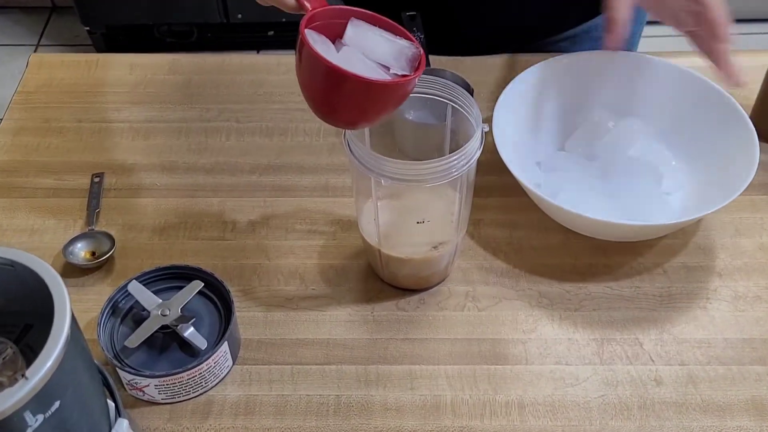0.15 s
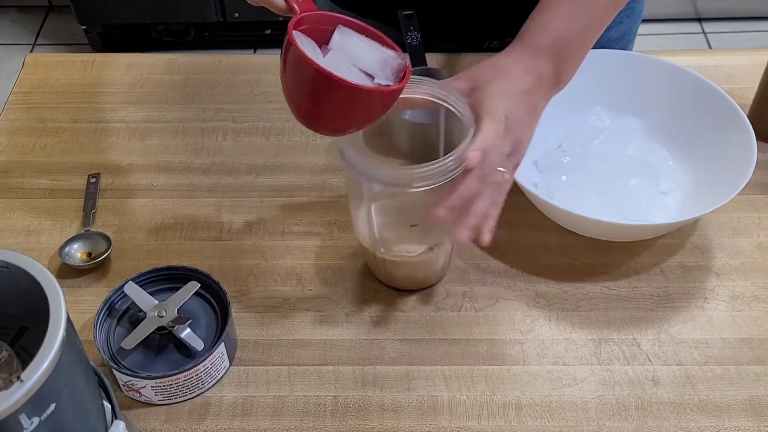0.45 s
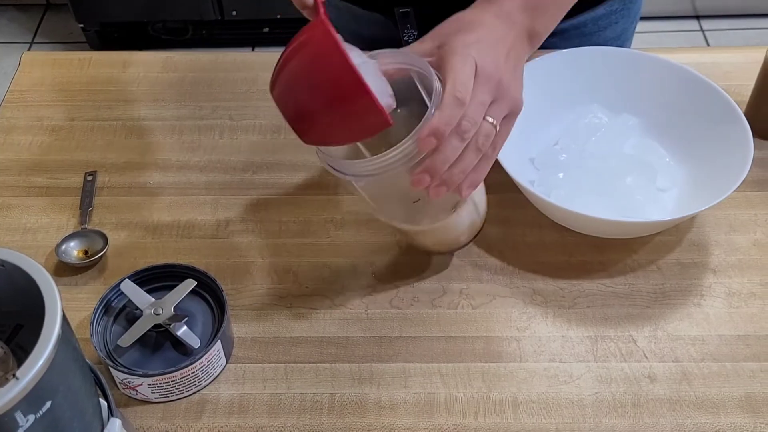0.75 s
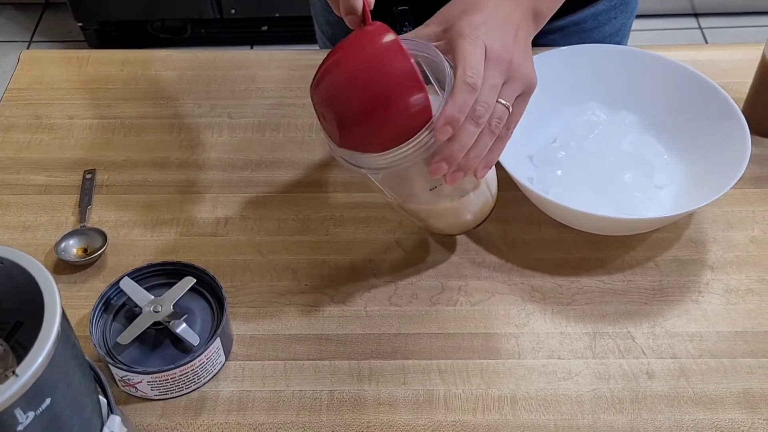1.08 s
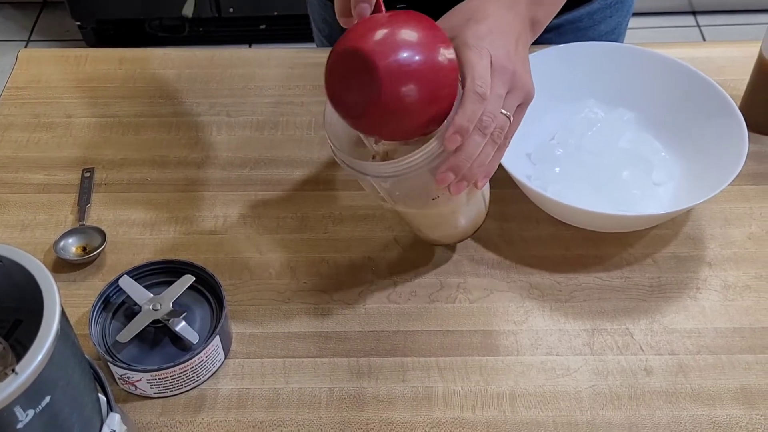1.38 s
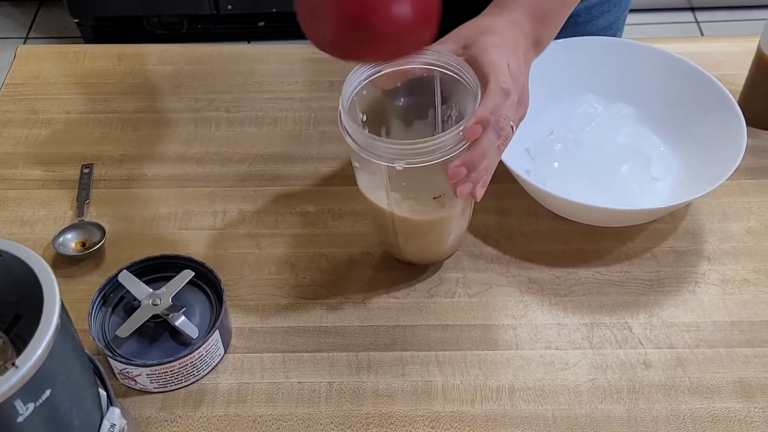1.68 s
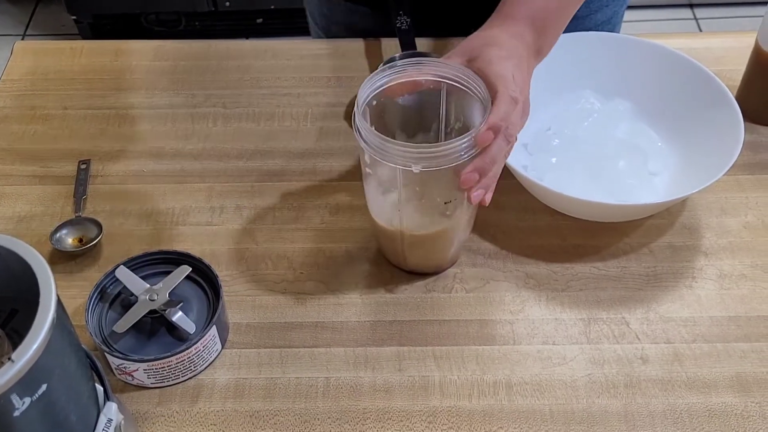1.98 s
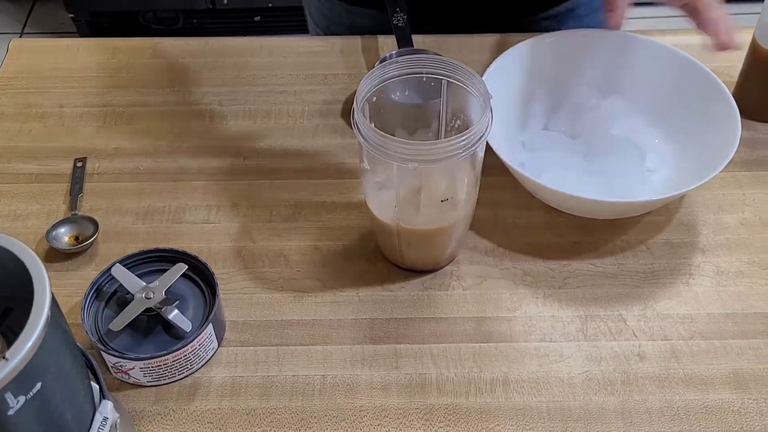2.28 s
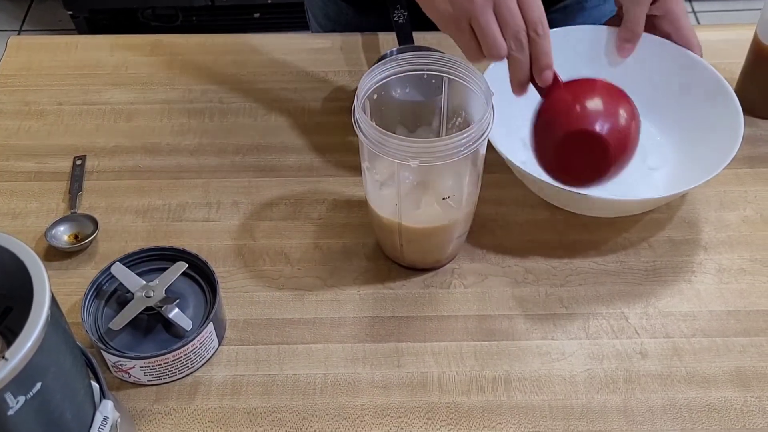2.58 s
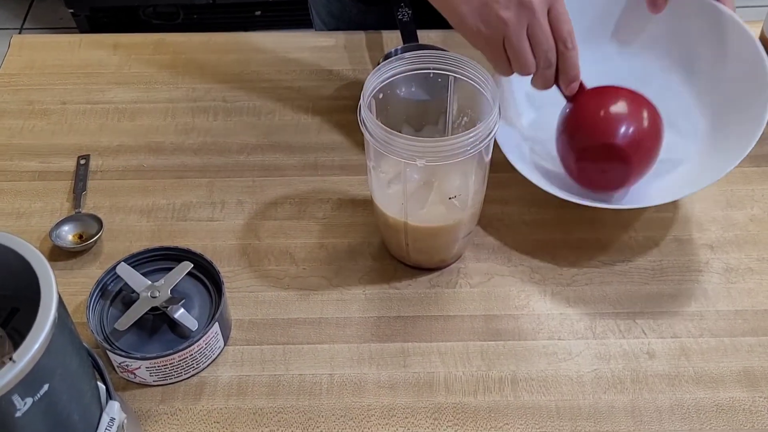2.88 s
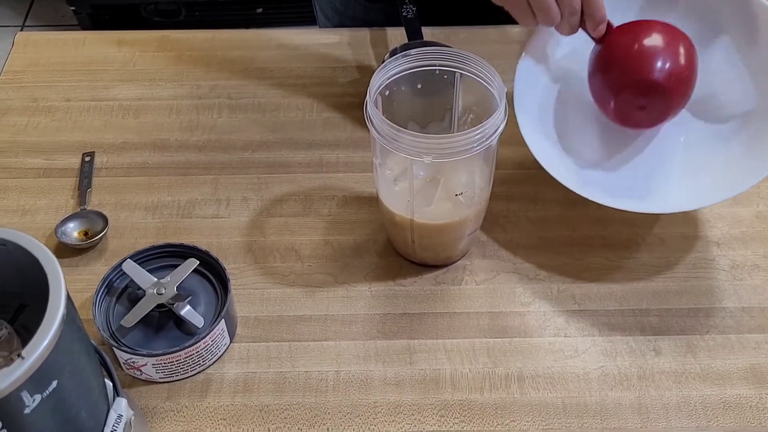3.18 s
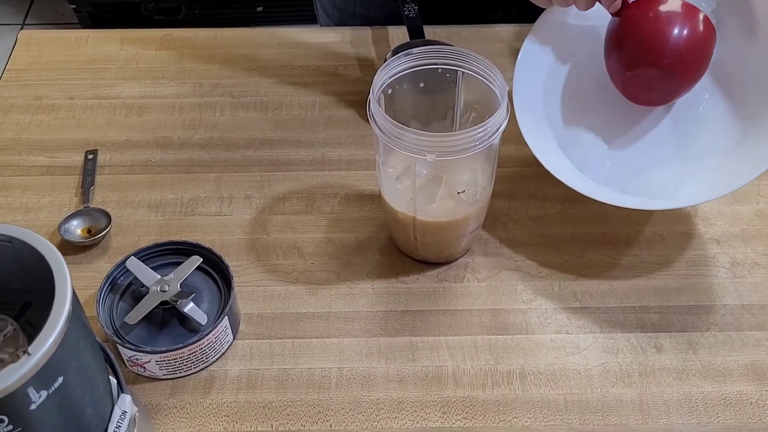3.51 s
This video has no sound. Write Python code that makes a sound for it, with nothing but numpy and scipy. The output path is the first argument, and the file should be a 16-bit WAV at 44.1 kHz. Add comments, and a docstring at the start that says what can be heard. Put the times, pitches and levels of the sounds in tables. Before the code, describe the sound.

Ice cubes rattle from a plastic cup into a blender jug, then get scooped from a bowl

```python
"""Soft knocks and bumps on a wooden counter, then ice cubes slide from a plastic cup into a blender jug.
Noise bursts, short grains and pings make the ice; the jug's hollow note dips, then climbs as it fills.
The jug lands with a thump and a thin metallic ring; a bowl knocks and slides, the cup digs into its ice.
Decaying modes give the thumps and the bowl, resonances colour the ice, gliding tones squeak.
A small, live kitchen echoes all this over quiet air and hum; the right side has more treble."""
import sys
import numpy as np
from scipy import signal
from scipy.fft import rfft, irfft
from scipy.io import wavfile
from scipy.ndimage import uniform_filter1d

SR = 44100
rng = np.random.default_rng(int(sys.argv[2]) if len(sys.argv) > 2 else 0)


def to_wav(sig):
    """Store sig (one row per channel, or 1-D mono) as 16-bit WAV at the path in sys.argv[1].

    Samples outside -1..1 are clipped; the rate is SR.
    """
    pcm = np.clip(np.atleast_2d(sig), -1, 1) * 32767
    pcm = np.round(pcm).astype(np.int16)
    wavfile.write(sys.argv[1], SR, pcm.T)  # frames by channels


N = 160965  # length in samples

# Edges of the low, middle, high and top bands of the ice: (frequency [Hz])
ICE_EDGES_HZ = [600, 1600, 4800, 8000, 15500]
# How alike the two channels of an ice blow are, per band: (correlation [0..1])
ICE_LIKENESS = [0.86, 0.37, 0.37, 0.71]
# Cubes dropping into the jug, before the drop trim:
# (time [s], low [dB], middle [dB], high [dB], top [dB])
DROPS = [(.791, -60, -65, -46, -87), (.864, -64, -60, -37, -51), (.9188, -43.5, -34.5, -22.5, -33),
         (1.0336, -33.5, -36, -23.5, -35.5), (1.0775, -29.5, -23, -33, -38.5),
         (1.1129, -29.5, -40, -21.5, -25.5), (1.1343, -36, -45.5, -19.5, -29.5),
         (1.1975, -43.5, -26.5, -34, -31.5), (1.2225, -33.5, -38.5, -26, -46.5),
         (1.2356, -25, -14.5, -14, -26), (1.2525, -29.5, -31.5, -16.5, -30), (1.282, -25.5, -36, -29, -35),
         (1.332, -37, -30, -26.5, -34.5), (1.503, -47, -54, -70, -47), (1.7559, -60, -50, -72, -87),
         (1.8028, -50.5, -43.5, -89, -80), (1.8796, -50.5, -45, -52, -60.5)]
# Decay of a drop, per band: (t60 [s])
DROP_T60 = [0.061, 0.042, 0.14, 0.067]
# Cubes jostling between the larger hits, before the pour trim: (time [s], body [dB], treble [dB])
POUR_MOTION = [(.76, -57, -57.5), (.85, -47.5, -51), (.91, -45, -62.5), (.95, -32.5, -29), (1.02, -35, -36),
               (1.09, -37, -32), (1.19, -53, -39.5), (1.27, -27.5, -31.5), (1.34, -28, -39),
               (1.42, -28.5, -29.5), (1.5, -52.5, -45), (1.58, -64.5, -85)]
# Resonances of the jug walls: (frequency [Hz], width [Hz], boost or cut [dB])
JUG_RESONANCES = [(836, 49, 1.5), (1157, 62, 6.5), (1700, 200, -11), (1934, 41, 7.5), (2150, 54, 10.5),
                  (2940, 140, 7), (6280, 150, 8)]
# Knocks on the air in the jug: (time [s], pitch [Hz], level [dB])
HOLLOW_NOTES = [(.93, 522, -42), (.97, 511, -40.5), (1.08, 493.2, -27), (1.125, 487, -26),
                (1.167, 500.5, -30), (1.262, 560.7, -25.5), (1.303, 577, -29), (1.38, 597, -44),
                (1.42, 615, -32), (1.465, 636, -43.5)]
HOLLOW_RISE_S, HOLLOW_WOBBLE = 0.011, 0.068  # time to full strength; rms share of the pitch
DROP_TRIM_DB, POUR_TRIM_DB = -4.5, -10


def pouring():
    """Ice tumbles into the jug and sounds its walls; the heavier cubes make the air inside hoot."""
    drops = blows(DROPS, ICE_EDGES_HZ, DROP_T60, ICE_LIKENESS)
    ice = amp(DROP_TRIM_DB) * drops + amp(POUR_TRIM_DB) * jostle(POUR_MOTION)
    out = vessel(ice, JUG_RESONANCES)
    for s, hz, db in HOLLOW_NOTES:
        add(out, s, amp(db) * chirp(hz, HOLLOW_RISE_S, 0, HOLLOW_WOBBLE))
    return out


# Single cubes and walls ringing out: (time [s], pitch [Hz], level [dB])
CLINKS = [(.791, 1230, -38.5), (.871, 1296, -34.5), (.92, 1265, -29), (1.034, 1214, -24),
          (1.151, 1130, -24), (1.222, 1130, -20.5), (1.281, 1097, -17), (1.404, 1968, -22.5),
          (1.41, 847, -21.5), (1.501, 850, -34.5), (2.889, 1757, -21.5), (3.143, 2090, -22),
          (3.163, 2160, -21), (3.185, 883, -19.5), (3.279, 866, -23), (3.351, 898, -17.5),
          (3.466, 877, -24), (3.614, 2200, -25.5)]
CLINK_T60_S = 0.037
PARTIAL_RATIO, PARTIAL_DB = 1.92, -16  # the weaker, higher partial, relative to the main one


def clinks():
    """Short pings among the rattle, each of two partials that die together."""
    out = np.zeros((2, N))
    for s, hz, db in CLINKS:
        main = (hz, db, CLINK_T60_S)
        upper = (hz * PARTIAL_RATIO, db + PARTIAL_DB, CLINK_T60_S)
        out += ring(s, [main, upper])
    return out


# Wet ice slipping: (time [s], pitch [Hz], level [dB], glide [octaves/s])
SQUEAKS = [(1.11, 3760, -22, 11), (1.11, 7530, -22, -8), (1.134, 6670, -23.5, -9), (1.348, 3400, -31.5, 12),
           (1.442, 3967, -31.5, 12.5), (2.902, 3850, -22.5, 10.5), (3.332, 7590, -14, -8.5)]
SQUEAK_RISE_S, SQUEAK_WOBBLE = 0.0043, 0.042  # time to full strength; rms share of the pitch


def squeaks():
    """Wet ice slips in brief gliding chirps."""
    out = np.zeros((2, N))
    for s, hz, db, glide in SQUEAKS:
        add(out, s, amp(db) * chirp(hz, SQUEAK_RISE_S, glide, SQUEAK_WOBBLE))
    return out


# The cup striking ice in the bowl, before the dig trim:
# (time [s], low [dB], middle [dB], high [dB], top [dB])
DIGS = [(2.49, -57, -57, -60, -68), (2.644, -45, -29.5, -23, -25.5), (2.7628, -23, -24.5, -20, -38),
        (2.8107, -23.5, -22, -28, -56), (2.883, -26.5, -21.5, -16, -19.5),
        (2.9469, -24.5, -22.5, -20, -21.5), (3.0232, -35, -21.5, -44, -52),
        (3.1015, -32.5, -24.5, -30, -38), (3.1414, -34, -25, -31.5, -36), (3.1848, -21.5, -21, -22, -29),
        (3.2382, -30, -21.5, -19.5, -31.5), (3.2771, -23, -23, -19.5, -26.5), (3.314, -27, -25, -20.5, -42),
        (3.333, -43, -47, -18, -18.5), (3.351, -21.5, -22.5, -16.5, -21.5), (3.377, -25, -16, -13.5, -19.5),
        (3.466, -28.5, -35, -25, -37), (3.62, -37, -33.5, -34, -39)]
# Decay of a dig, per band: (t60 [s])
DIG_T60 = [0.087, 0.11, 0.091, 0.025]
# Cubes jostling around the cup, before the scoop trim: (time [s], body [dB], treble [dB])
SCOOP_MOTION = [(2.765, -21.5, -14), (2.82, -25, -25), (2.92, -33, -42), (3.0, -27.5, -22.5),
                (3.12, -39.5, -28), (3.2, -30.5, -31), (3.3, -32, -26.5), (3.38, -48, -22),
                (3.46, -28, -43), (3.52, -65, -56), (3.6, -41, -42), (3.65, -34, -59)]
# Resonances of the ice lying in the bowl: (frequency [Hz], width [Hz], boost [dB])
HEAP_RESONANCES = [(730, 23, 5.5), (880, 73, 7.1), (4130, 400, 4.1), (6860, 1600, 6.56)]
# Resonances of the cup: (frequency [Hz], width [Hz], boost [dB])
CUP_RESONANCES = [(2200, 70, 12.3), (2415, 51, 11.3)]
# Modes of the bowl, struck once by the cup: (frequency [Hz], level [dB], t60 [s])
BOWL_MODES = [(970, -24, 0.054), (1422, -18, 0.049), (1480, -26, 0.026), (2028, -22, 0.06),
              (2736, -29, 0.11), (4870, -23.5, 0.058), (8300, -29.5, 0.12)]
DIG_TRIM_DB, SCOOP_TRIM_DB = -5, -9.5
CUP_FILLED_S = 3.13  # from here on cubes rattle inside the cup
BOWL_AT_S, BOWL_BUZZ = 2.644, 0.36  # the rim of the cup buzzes against the bowl, rms depth
BOWL_LAG_S = .0001  # the bowl stands to the right, so it reaches the left microphone later


def scooping():
    """The cup clacks on the bowl and ploughs through the cubes, which then rattle inside it."""
    digs = blows(DIGS, ICE_EDGES_HZ, DIG_T60, ICE_LIKENESS)
    ice = amp(DIG_TRIM_DB) * digs + amp(SCOOP_TRIM_DB) * jostle(SCOOP_MOTION)
    caught = ice * (np.arange(N) / SR > CUP_FILLED_S)
    cup_ring = vessel(caught, CUP_RESONANCES) - caught
    clack = ring(BOWL_AT_S, BOWL_MODES) * (1 + BOWL_BUZZ * flutter((2, N)))
    left, right = vessel(ice, HEAP_RESONANCES) + cup_ring + clack + ice_thud(ice)
    late_left = np.pad(left, (round(BOWL_LAG_S * SR), 0))[:N]
    return np.array([late_left, right])


# What the counter passes on of the digging: (frequency [Hz], gain [dB])
THUD_COLOUR = [(120, -19), (240, 2), (330, 3), (520, -3), (900, -20), (3000, -69)]
THUD_UNTIL_S, THUD_FADE_DB_PER_S = 2.95, 19  # the cup presses on the bowl, then lifts


def ice_thud(ice):
    """The push of each contact reaches the counter as a low patter, fading as the cup lifts."""
    push = np.sqrt(abs(uniform_filter1d(ice.mean(0) ** 2, size=200)) + 1e-14)
    lifted_s = np.maximum(np.arange(N) / SR - THUD_UNTIL_S, 0)
    fade = amp(-THUD_FADE_DB_PER_S * lifted_s)
    return colour(push * fade * rng.standard_normal(N), THUD_COLOUR)


# The jug landing and settling: (time [s], thump [dB], low [dB], middle [dB], high [dB])
JUG_KNOCKS = [(1.9197, -6.5, -26, -29.5, -31), (1.9278, -29, -21.5, -31.5, -35.5),
              (1.941, -17, -28.5, -37.5, -47), (1.967, -28, -32.5, -42, -39.5),
              (2.01, -26.5, -35, -43, -45)]
# Modes of the wooden top under the jug: (frequency [Hz], level [dB], t60 [s])
COUNTER_MODES = [(46.6, -27, 0.36), (117, -17, .1), (250, 4, 0.06), (395, -14, 0.073), (672, -8, 0.071)]
# The bowl knocking on the counter: (time [s], thump [dB], low [dB], middle [dB], high [dB])
BOWL_KNOCKS = [(.002, -24, -34.5, -42, -49), (.03, -24.5, -38.5, -53, -57.5),
               (2.569, -19, -38, -43.5, -53.5), (2.603, -22, -32.5, -54, -68),
               (2.645, -17.5, -34, -51, -60)]
# Modes of the bowl rocking on its foot: (frequency [Hz], level [dB], t60 [s])
FOOT_MODES = [(267, -2.5, 0.1), (342, -3.5, 0.051), (444, -1, .03)]
# Soft, dull bumps as jug and bowl are handled, and last the low rumble of the bowl sliding:
# (time [s], level [dB])
BUMPS = [(0.29, -36), (0.326, -27.5), (.368, -23), (.45, -34), (.495, -46.5), (2.655, -31.5)]
# Spectrum of a bump: (frequency [Hz], gain [dB])
BUMP_COLOUR = [(30, -30), (70, -4.5), (150, 2.5), (300, -5), (600, -22.5), (1200, -35), (12000, -65.5)]
# Thin metallic ring shaken loose when the jug lands: (frequency [Hz], level [dB], t60 [s])
TING_MODES = [(8420, -47, 0.2), (8040, -43, 0.3), (8900, -40, 0.25), (11910, -37, 0.31), (13360, -50, 0.12)]
BUMP_RISE_S, BUMP_T60_S, TING_AT_S = 0.03, 0.23, 1.921


def counter():
    """The jug lands, the bowl rocks on its foot; dull noise swells for handling and the bowl sliding."""
    out = knocks(JUG_KNOCKS, COUNTER_MODES) + knocks(BOWL_KNOCKS, FOOT_MODES)
    t = np.arange(SR // 4) / SR
    for s, db in BUMPS:
        dull = unit(colour(rng.standard_normal(len(t)), BUMP_COLOUR))
        swell = np.minimum(t / BUMP_RISE_S, 1)
        add(out, s, dull * swell * amp(db - 60 * t / BUMP_T60_S))
    return out + ring(TING_AT_S, TING_MODES)


# Edges of the three clatter bands: (frequency [Hz])
KNOCK_EDGES_HZ = [310, 780, 1900, 7000]
# Decay of the clatter, per band: (t60 [s])
KNOCK_T60 = [0.065, 0.18, 0.035]
# How alike the two channels of the clatter are, per band: (correlation [0..1])
KNOCK_LIKENESS = [0.99, 0.59, 0.33]
THUMP_LOW_CUT_HZ = 68  # keeps the thump free of deep boom


def knocks(rows, modes):
    """Hard contacts with the counter: a thump in the given modes under a short clatter."""
    clatter = [(s, *bands) for s, _, *bands in rows]
    out = blows(clatter, KNOCK_EDGES_HZ, KNOCK_T60, KNOCK_LIKENESS)
    low_cut = signal.butter(3, THUMP_LOW_CUT_HZ, "high", fs=SR, output="sos")
    thump = signal.sosfilt(low_cut, ring(0, modes))
    for s, thump_db, *_ in rows:
        add(out, s, -amp(thump_db) * thump)
    return out


CRACK_DB, CRACK_S = -2, .0025  # first instant of contact: level against the ring, time constant
CHATTER_DB = 4.5  # a contact rattles briefly: level swing per unit of flutter


def blows(rows, edges_hz, t60s, likeness):
    """Each blow is a crack and a brief chattering ring, dying at its own rate in each band."""
    t, out = np.arange(SR // 8) / SR, np.zeros((2, N))
    noise = rng.standard_normal((len(rows), len(t60s), 2, len(t)))
    chatter = amp(CHATTER_DB * np.minimum(flutter((len(rows), 1, len(t))), 2))
    crack = amp(CRACK_DB) * np.exp(-t / CRACK_S)
    level = np.sqrt(SR / 100 / len(t))  # each hit has the energy of 10 ms at its table level
    for k, t60 in enumerate(t60s):
        c = likeness[k]
        stereo = np.array([[1, 0], [c, np.sqrt(1 - c * c)]]) @ noise[:, k]
        decay = np.exp(-np.log(1000) * t / t60)
        band = signal.butter(3, edges_hz[k:k + 2], "band", fs=SR, output="sos")
        hits = signal.sosfilt(band, stereo * (chatter * decay + crack))
        for row, hit in zip(rows, hits):
            add(out, row[0], amp(row[k + 1]) * unit(hit) * level)
    return out


GRAINS_PER_S, GRAIN_SPREAD_DB = 600, 4.5  # mean rate; scale of the random extra strength
BODY_HZ, TREBLE_HZ, FIZZ_HZ = (646.3, 3492), (3198, 8100), (7160, 15800)  # range of the modes
FIZZ_DB = -9.5  # relative to the treble


def jostle(curve):
    """Many small contacts of cube on cube, following the motion of the heap."""
    s, body_db, treble_db = np.transpose(curve)
    t = np.arange(N) / SR
    moving = (t > s[0]) & (t < s[-1])
    strength = amp(GRAIN_SPREAD_DB * np.minimum(rng.exponential(1, N), 4))
    clicks = moving * (rng.random(N) < GRAINS_PER_S / SR) * strength
    rms_moving = np.sqrt(moving.mean())  # sets rms near 1 while the heap moves
    body, treble, fizz = (unit(grains(clicks, band)) * rms_moving for band in (BODY_HZ, TREBLE_HZ, FIZZ_HZ))
    bright = treble + amp(FIZZ_DB) * fizz
    return body * amp(np.interp(t, s, body_db)) + bright * amp(np.interp(t, s, treble_db))


GRAIN_CYCLES = 12  # cycles until a mode falls to 1/e


def grains(clicks, range_hz, count=48):
    """Every small contact rings three of many short modes, differently at each microphone."""
    t, out = np.arange(1024) / SR, np.zeros((2, N))
    at = np.flatnonzero(clicks)
    hz = np.geomspace(*range_hz, count)
    sides = np.array([0, 1])[:, None, None]
    for s, chance in zip(at, rng.random((len(at), 3, 4))):
        mode_hz = hz[(chance[:, 0] * count).astype(int), None]
        f = mode_hz * (1 + 0.063 * (chance[:, 1:2] - .5))  # slightly detuned
        phase = 2 * np.pi * chance[:, 2:3] + sides * (chance[:, 3:] - .5) * f / 1500
        modes = np.sin(2 * np.pi * f * t + phase) * np.exp(-f * t / GRAIN_CYCLES)
        add(out, s / SR, clicks[s] * modes.sum(1))
    return out


def ring(at_s, modes):
    """Freely dying modes, struck once; neighbours start in opposite directions."""
    t, out = np.arange(SR // 2) / SR, np.zeros((2, N))
    sound = np.zeros(len(t))
    for k, (hz, db, t60) in enumerate(modes):
        sound += (-1) ** k * amp(db - 60 * t / t60) * np.sin(2 * np.pi * hz * t)
    add(out, at_s, sound)
    return out


def chirp(hz, rise_s, glide, wobble):
    """An unsteady tone that swells and dies away, gliding in octaves per second."""
    t = np.arange(SR // 8) / SR
    octaves = glide * np.minimum(t, 10 * rise_s)
    pitch = hz * 2 ** octaves * (1 + wobble * flutter(len(t)))
    swell = t / rise_s * np.exp(1 - t / rise_s)
    return swell * np.sin(2 * np.pi * np.cumsum(pitch) / SR)


def vessel(x, modes):
    """Lets a vessel ring along with what strikes it."""
    return x + sum((amp(db) - 1) * resonate(x, hz, width) for hz, width, db in modes)


def resonate(x, hz, width):
    """A resonance of gain 1: shifted down to 0 Hz, smoothed by one pole, shifted back."""
    turn, r = np.exp(2j * np.pi * hz * np.arange(N) / SR), np.exp(-np.pi * width / SR)
    smooth = signal.lfilter([1 - r], [1, -r], x / turn + 1e-18)
    return 2 * (turn * smooth).real


# Decay of the kitchen: (frequency [Hz], t60 [s])
ROOM_T60 = [(60, 0.3), (250, 0.42), (800, 0.48), (2500, 0.56), (6000, 0.43), (14000, 0.31)]
ROOM_DB, KNOCK_ROOM_DB = -5, -2  # tail level for the ice; for the counter
EARLY_DB, EARLY_S, ROOM_ONSET_S = -6, .016, 0.011  # reflections: level, span; build-up of the tail


def kitchen(x, room_db):
    """A few reflections from the counter and cupboards, then a diffuse tail."""
    hz, t, z = signal.stft(rng.standard_normal((2, SR * 3 // 4)), SR, nperseg=256)
    decay = amp(-60 * t / read(ROOM_T60, hz)[:, None])
    tail = pair(signal.istft(z * decay, SR, nperseg=256)[1])
    t = np.arange(tail.shape[1]) / SR
    tail *= 1 - np.exp(-t / ROOM_ONSET_S)
    early = np.zeros_like(tail)
    for side in early:
        at = (rng.uniform(.1, 1, size=10) * EARLY_S * SR).astype(int)
        side[at] = rng.choice([-1, 1], size=10)
    early = unit(pair(early) * (t < 2 * EARLY_S))
    echo = (amp(room_db) * unit(tail) + amp(EARLY_DB) * early) / np.sqrt(len(t))
    return x + signal.fftconvolve(x, echo, axes=1)[:, :N]


# Spectrum of the quiet air: (frequency [Hz], gain [dB])
AIR_COLOUR = [(20, -15.5), (45, -11.5), (270, -4), (500, -13), (1500, -25), (7300, -29.5), (16000, -50)]
AIR_DB, HUM_HZ, HUM_DB = -56.5, 117.3, -62


def room_tone():
    """Quiet air as coloured noise, and a faint appliance hum as one sine."""
    air = unit(colour(pair(rng.standard_normal((2, N))), AIR_COLOUR))
    hum = np.sin(2 * np.pi * HUM_HZ * np.arange(N) / SR)
    return amp(AIR_DB) * air + amp(HUM_DB) * hum


# How alike the two channels of a diffuse field are: (frequency [Hz], correlation [0..1])
FIELD_LIKENESS = [(300, 0.87), (700, 0.38), (1500, 0), (4000, 0.0073), (15000, 0.82)]


def pair(x):
    """Makes two unrelated channels partly alike, by frequency, as in a diffuse field."""
    z = rfft(x)
    c = np.clip(read(FIELD_LIKENESS, np.fft.rfftfreq(x.shape[1], 1 / SR)), 0, 1)
    return irfft(np.array([z[0], c * z[0] + np.sqrt(1 - c ** 2) * z[1]]), x.shape[1])


def flutter(shape):
    """Random unevenness of rms 1 that changes about every millisecond."""
    return unit(uniform_filter1d(rng.standard_normal(shape), size=40, axis=-1))


def colour(x, points):
    """Filters by a (frequency [Hz], gain [dB]) table."""
    size = 2 * x.shape[-1]
    gain = amp(read(points, np.fft.rfftfreq(size, 1 / SR)))
    return irfft(rfft(x, size) * gain, size)[..., :size // 2]


def read(points, hz):
    """Reads a table on a log-frequency axis."""
    f, value = np.transpose(points)
    return np.interp(np.log(hz + 1), np.log(f + 1), value)


def add(mix, s, sound):
    """Adds a sound to a stereo mix at time s."""
    part = mix[:, max(round(s * SR), 0):][:, :sound.shape[-1]]
    part += sound[..., :part.shape[1]]


def amp(db):
    """Decibels to gain."""
    return 10 ** (np.asarray(db) / 20)


def unit(x):
    """Scales to rms 1."""
    return x / np.sqrt(np.mean(x ** 2) + 1e-20)


def scene():
    """Ice, digging and counter, each echoed by the kitchen, over the room tone."""
    # the pour, with the clinks and squeaks of both pouring and digging
    pour_and_pings = kitchen(pouring() + clinks() + squeaks(), ROOM_DB)
    digging = kitchen(scooping(), ROOM_DB)
    return pour_and_pings + digging + kitchen(counter(), KNOCK_ROOM_DB) + room_tone()


# Colour of the left microphone: (frequency [Hz], gain [dB])
LEFT_COLOUR = [(100, -4), (2400, 0.5), (4200, -3.5), (7500, -10.5), (11000, -6.5), (15000, -11.5)]
# Colour of the right microphone: (frequency [Hz], gain [dB])
RIGHT_COLOUR = [(100, -2.5), (2400, 0.5), (4200, 1), (5200, -4), (7200, 3.5), (9500, -1.5), (15000, -9.5)]
EDGE_HZ = 16000  # upper band limit


def record(dry):
    """The colour of each microphone, soft overload on the highest peaks, then the band limit."""
    heard = np.array([colour(dry[0], LEFT_COLOUR), colour(dry[1], RIGHT_COLOUR)])
    heard = heard / (1 + (heard / .9) ** 6) ** (1 / 6)  # levels off towards 0.9
    low_pass = signal.firwin(255, EDGE_HZ, window=("kaiser", 8), fs=SR)
    return signal.oaconvolve(heard, low_pass[None], "same")


dry = scene()
out = record(dry)
to_wav(out)
```